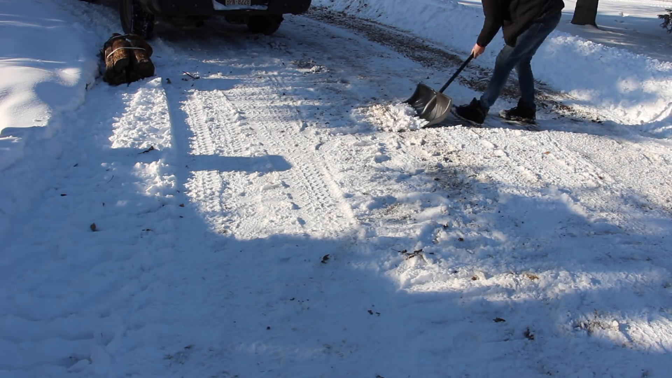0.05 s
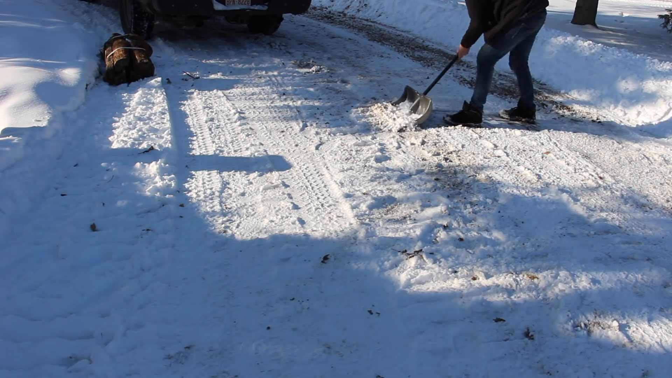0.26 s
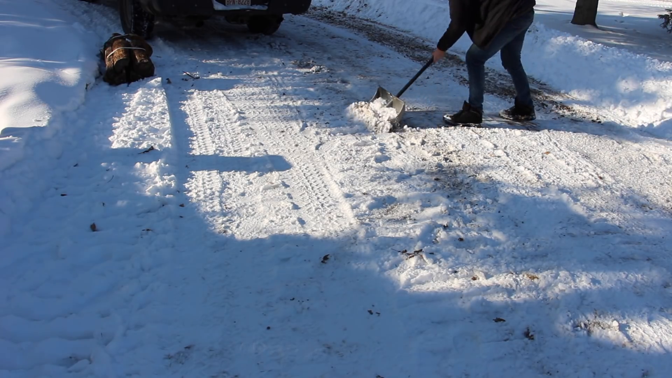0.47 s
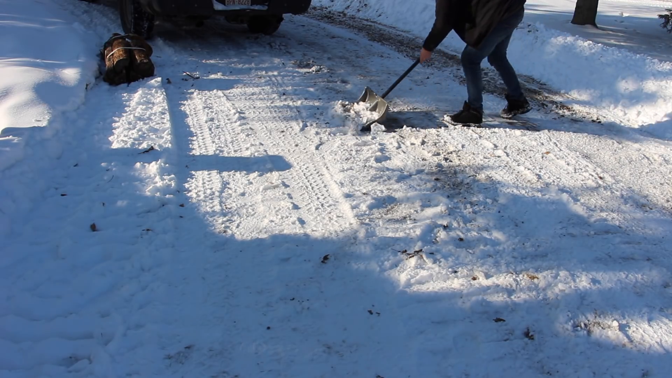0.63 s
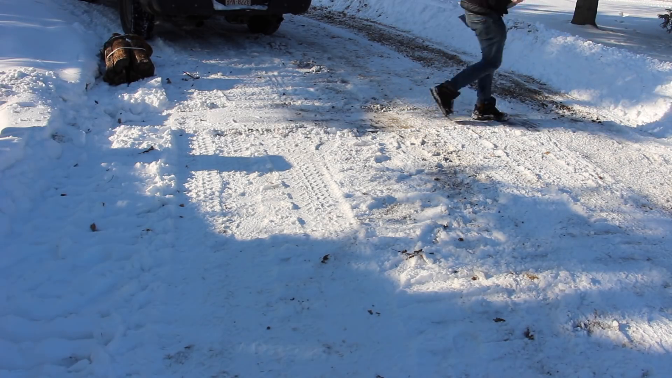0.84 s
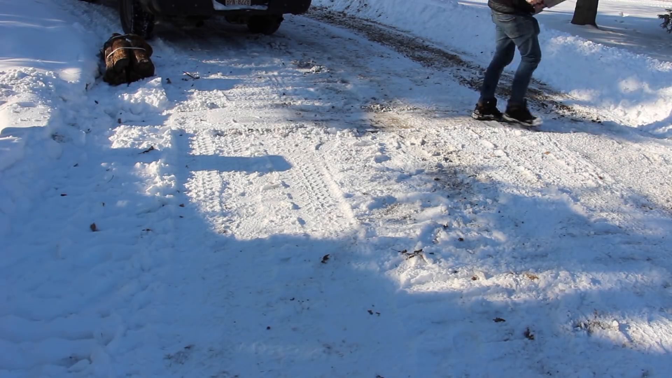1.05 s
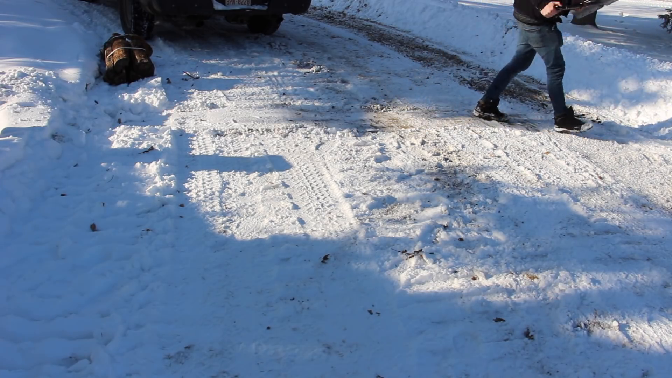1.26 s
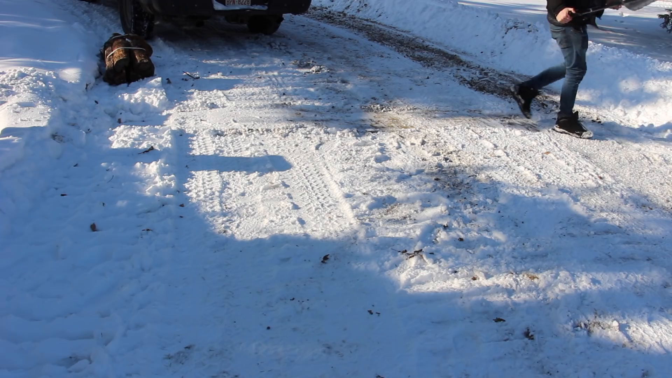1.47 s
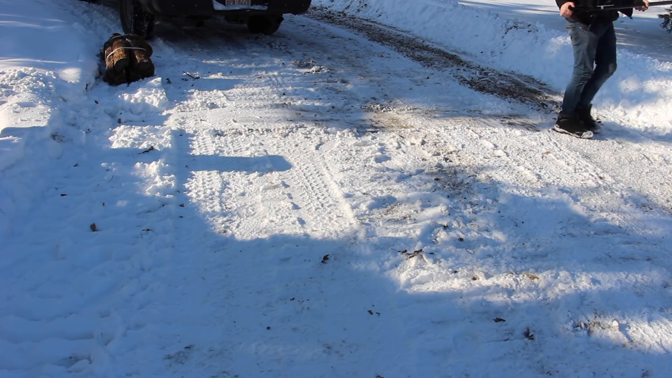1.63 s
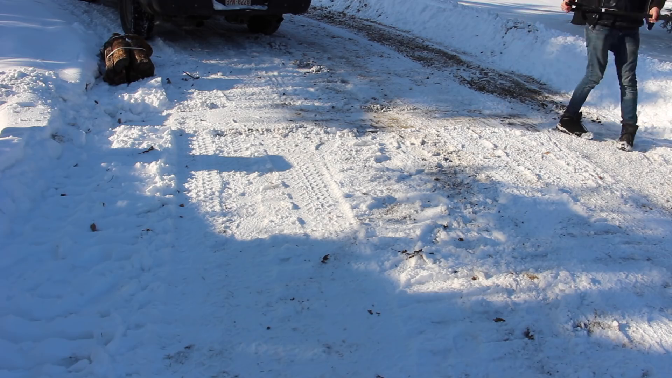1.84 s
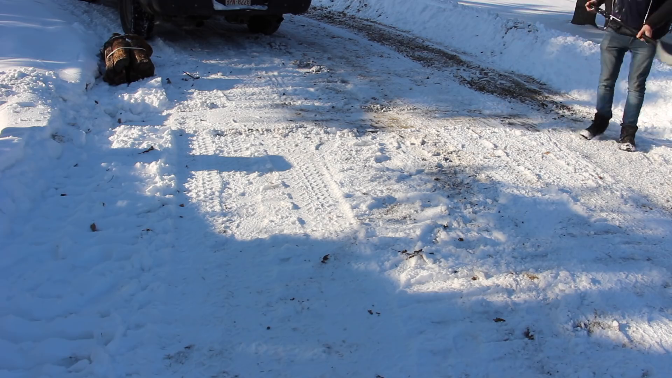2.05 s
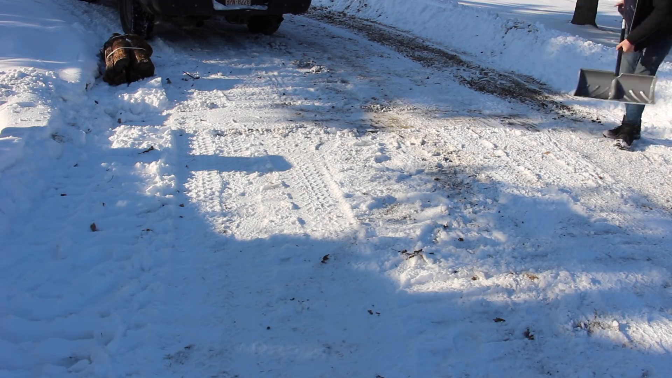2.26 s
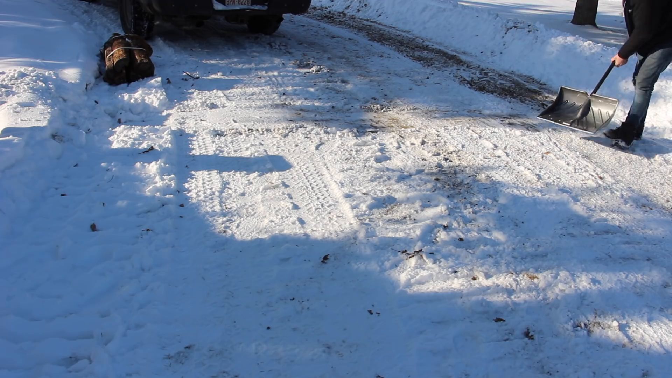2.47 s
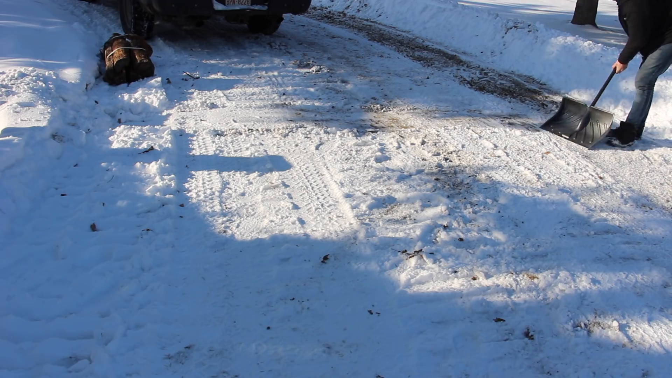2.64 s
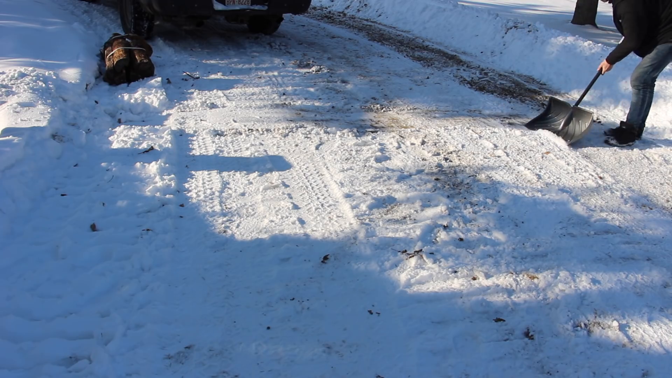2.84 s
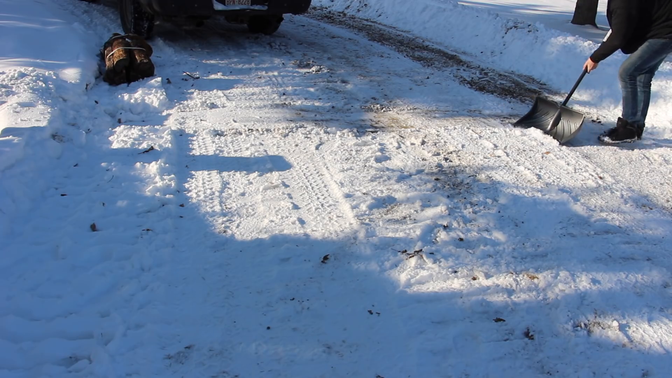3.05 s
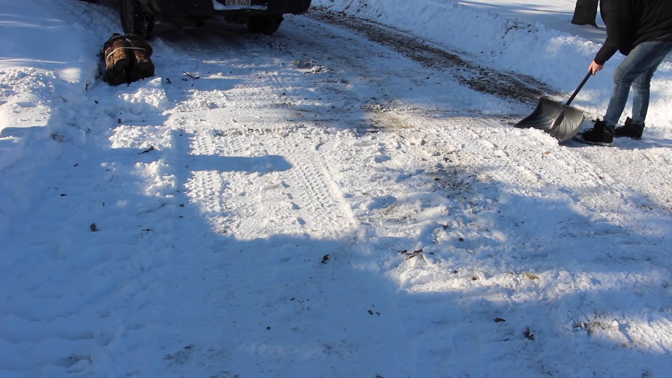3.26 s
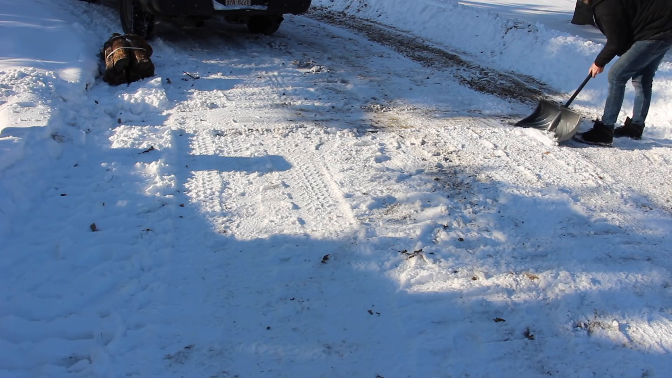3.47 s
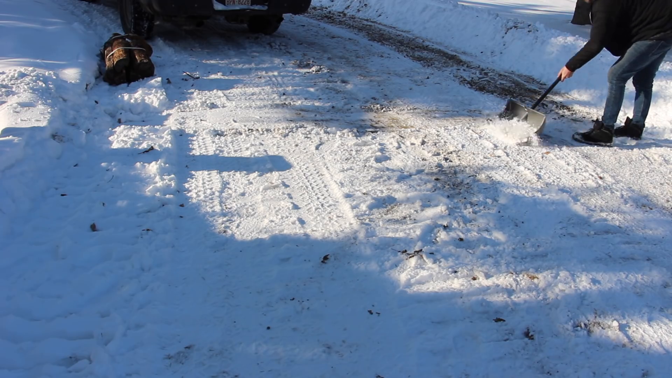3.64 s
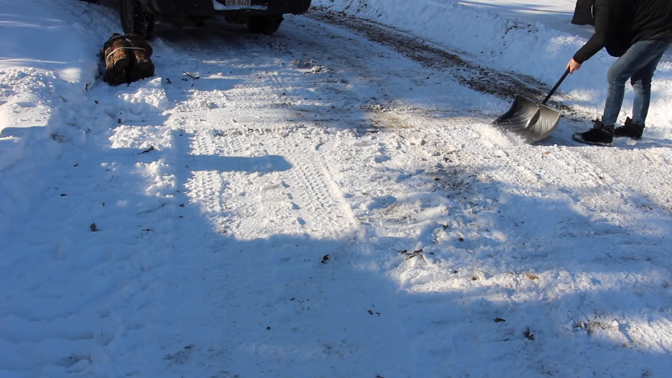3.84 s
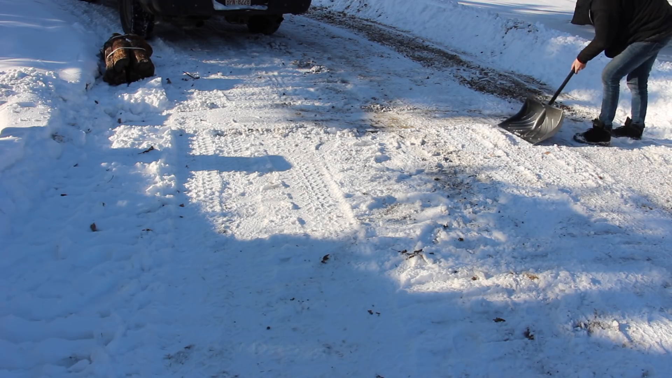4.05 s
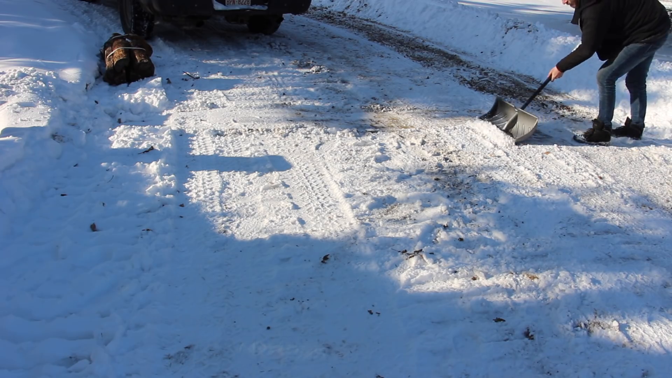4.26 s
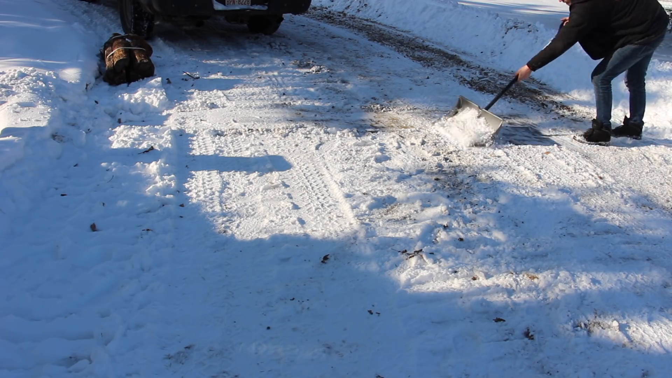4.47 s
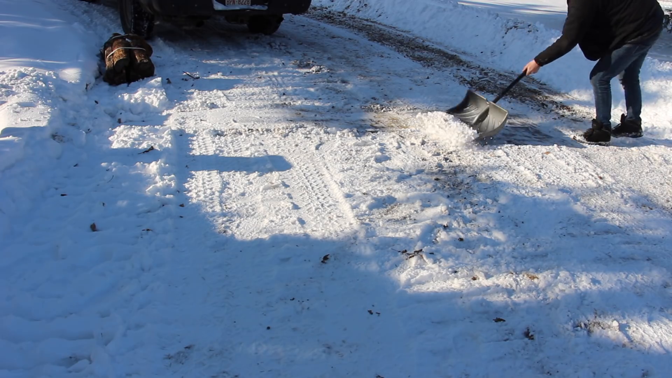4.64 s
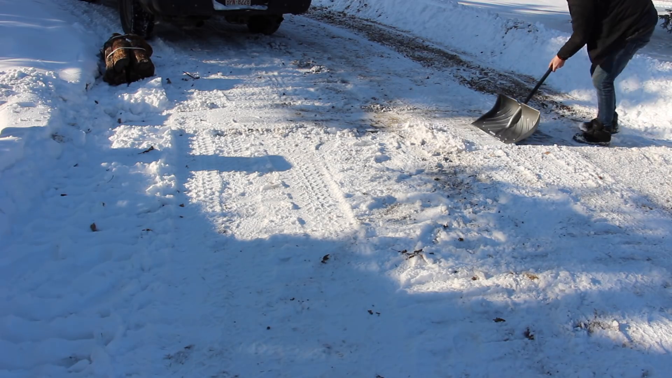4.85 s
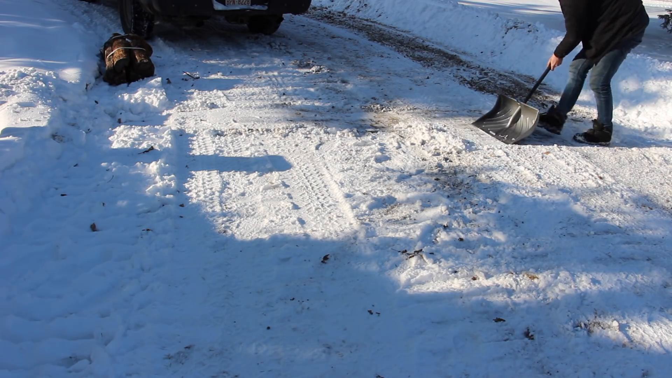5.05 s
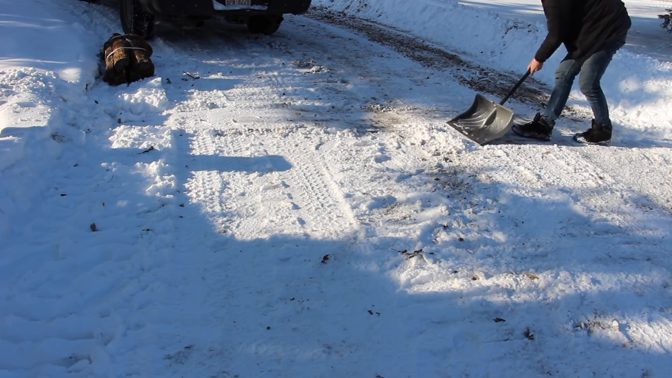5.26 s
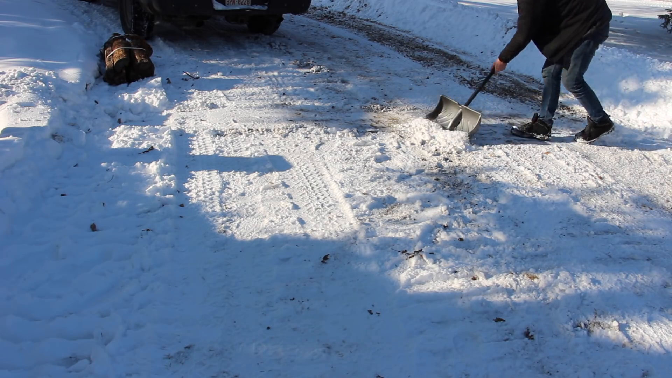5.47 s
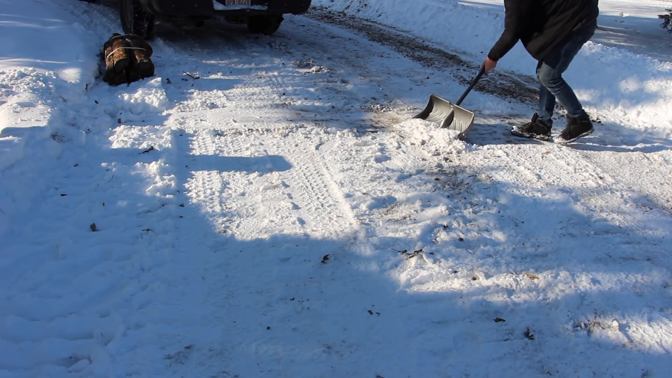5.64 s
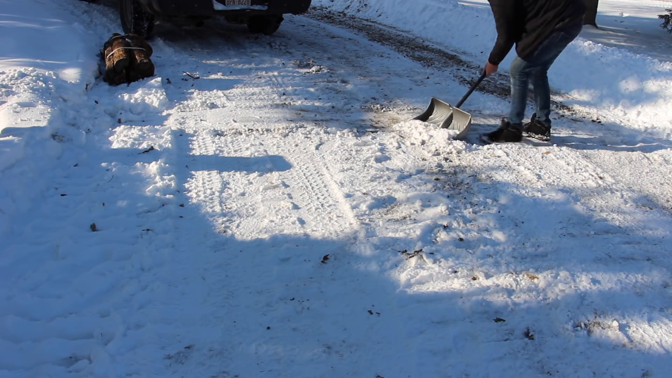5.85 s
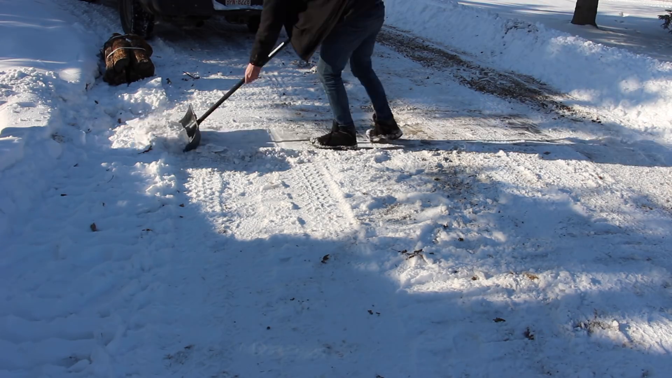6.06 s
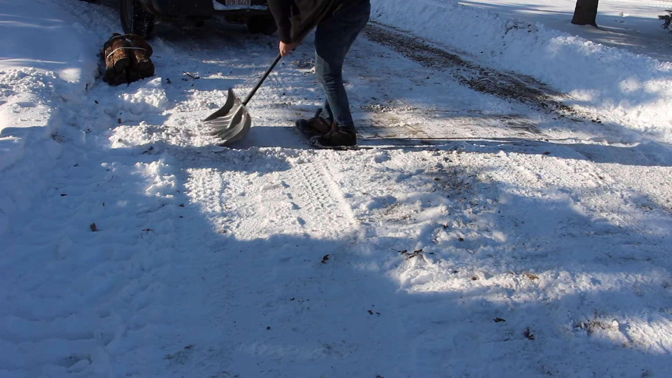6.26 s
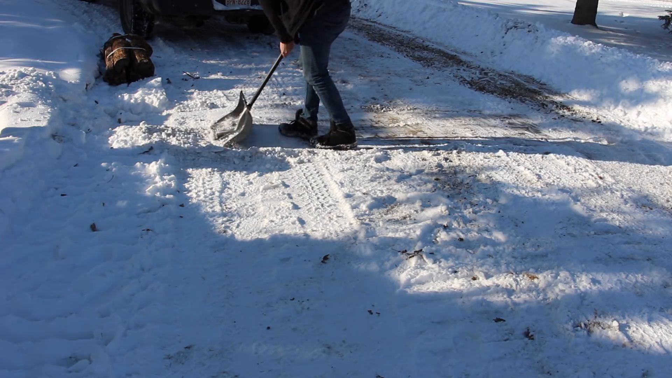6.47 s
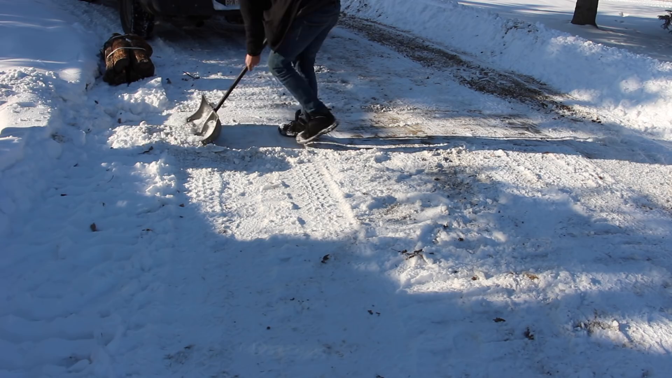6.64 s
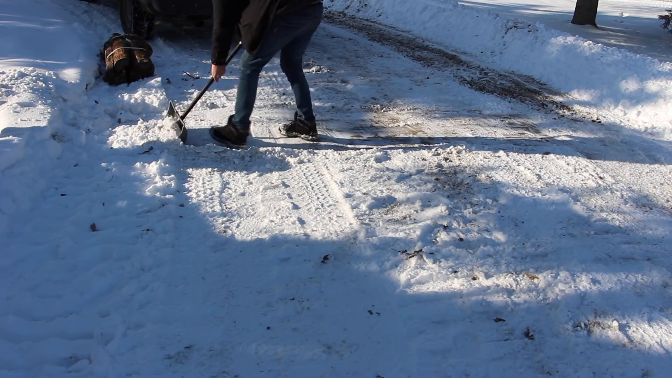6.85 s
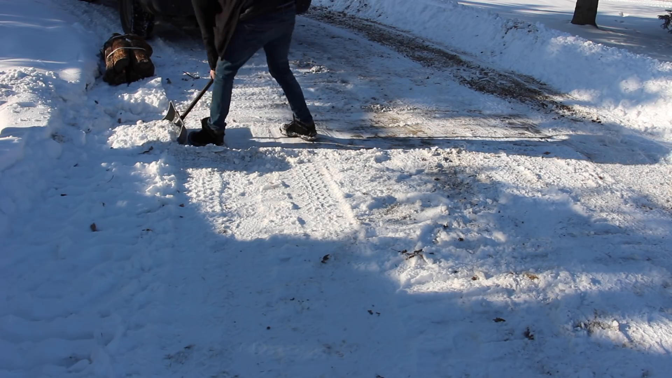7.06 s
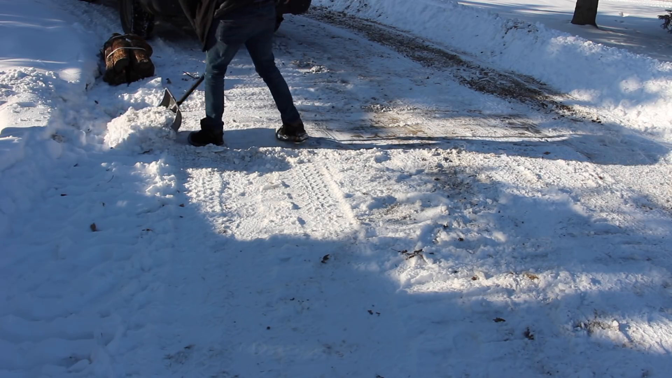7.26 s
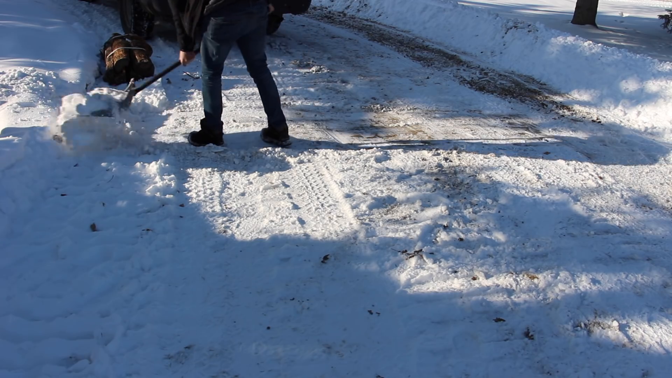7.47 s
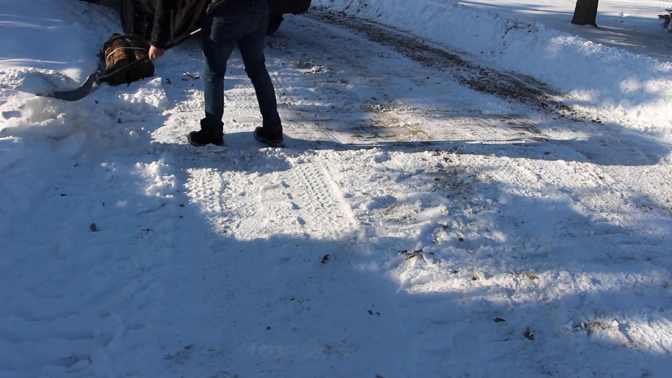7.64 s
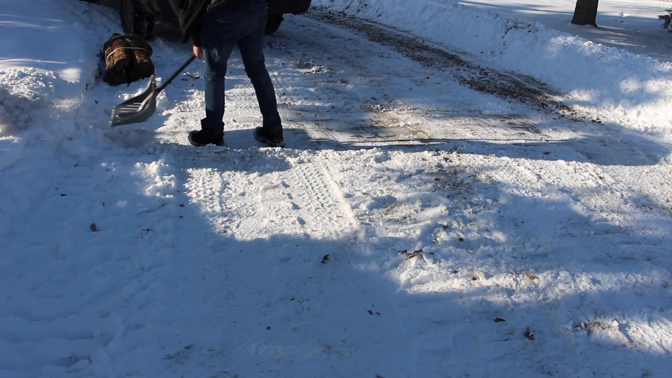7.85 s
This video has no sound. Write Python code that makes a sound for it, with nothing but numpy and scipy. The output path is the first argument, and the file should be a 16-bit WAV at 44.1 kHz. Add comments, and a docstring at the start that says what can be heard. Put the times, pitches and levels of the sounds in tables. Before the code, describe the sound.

A plastic snow shovel scrapes gritty, icy gravel in short hard pushes, stones knocking the blade, with boots crunching in snow between strokes outdoors.

```python
"""A plastic snow shovel is pushed in short strokes over icy gravel: random grit clicks ring the blade's modes.
It works in a yard a few metres from a small housing with two microphone ports. Stones and ice knock the blade,
each a burst of noise through its modes, and the ground thumps in low noise; around and between the strokes
boots crunch and loose snow slides as shaped clicks, and crust snaps with a tick and a dull swing.
Late on, light wind puffs on the ports as low noise, over a quiet bed of air."""
import sys
import numpy as np
from scipy import signal
from scipy.fft import rfft, irfft, next_fast_len
from scipy.io import wavfile
from scipy.ndimage import uniform_filter1d

SR = 44100
rng = np.random.default_rng(int(sys.argv[2]) if len(sys.argv) > 2 else 0)


def dump(signal):
    """Clip the signal to [-1, 1] and save it as 16-bit WAV at the path in sys.argv[1]."""
    limited = np.clip(np.atleast_2d(signal).T, -1, 1)
    pcm = np.round(limited * 32767).astype(np.int16)
    wavfile.write(sys.argv[1], SR, pcm)


N = 348831


def amp(db):
    """Gain of a level in dB."""
    return 10 ** (np.asarray(db) / 20)


def level_db(gain):
    """Level of a gain in dB."""
    return 20 * np.log10(gain + 1e-6)


def evened(x):
    """Scales to rms 1."""
    return x / np.sqrt(np.mean(x ** 2) + 1e-20)


def read(points, hz):
    """Reads a spectrum table on a log frequency axis."""
    f, value = np.transpose(points)
    return np.interp(np.log(hz + 1), np.log(f + 1), value)


def coloured(x, points):
    """Shapes the spectrum by a table, then scales to rms 1."""
    size = next_fast_len(x.shape[-1])
    gain = amp(read(points, np.fft.rfftfreq(size, 1 / SR)))
    return evened(irfft(rfft(x, size) * gain, size)[..., :x.shape[-1]])


def band(x, lo_hz, hi_hz):
    """Band-pass, rms 1."""
    return evened(signal.sosfilt(signal.butter(2, [lo_hz, hi_hz], "bandpass", fs=SR, output="sos"), x))


def controls(tables):
    """Joins tables into curves at sample rate; the first column becomes a gain, zero outside the tables."""
    t, out = np.arange(N) / SR, np.zeros((len(tables[0][0]) - 1, N))
    for rows in tables:
        s, *columns = np.transpose(rows)
        inside = slice(round(s[0] * SR), min(round(s[-1] * SR), N))
        before = out[0, inside].copy()
        out[:, inside] = [np.interp(t[inside], s, c) for c in columns]
        fade = signal.windows.tukey(len(t[inside]), min(1, 0.0042 / (s[-1] - s[0])))
        out[0, inside] = np.maximum(before, amp(out[0, inside]) * fade)
    return out


def grit(per_s, spread_db, clump_db, clump_s):
    """Clicks of random sign and unequal size, stronger in clumps that start fast and die away."""
    sizes = amp(spread_db * np.minimum(rng.exponential(1, N), 4)) * rng.choice([-1., 1.], N)
    fade = np.exp(-1 / (clump_s * SR))
    starts = rng.exponential(1, N) * (rng.random(N) < 1 / (clump_s * SR))
    clumps = signal.lfilter([1], [1, -fade], starts)
    clicks = sizes * (rng.random(N) < per_s / SR)
    return clicks * (clumps + amp(-clump_db))  # a steady share lies under the clumps


def add(mix, s, sound):
    """Mixes a sound in at a time in seconds."""
    part = mix[round(s * SR):][:len(sound)]
    part += sound[:len(part)]


# colour of the quiet yard: (frequency [Hz], relative density [dB per Hz])
AIR_COLOUR = [(15, -37), (25, -0.5), (500, 2), (655, -0.5), (3690, -9), (4450, -12), (6160, -15),
              (6860, -17), (8290, -18), (15800, -23)]


def air():
    """The quiet yard as steady noise, partly alike in both ports."""
    common, left, right = coloured(rng.standard_normal((3, N)), AIR_COLOUR)
    return amp(-58) * np.array([common + 1.6 * left, common + 1.4 * right])  # -58 dB is the common part


# colours of dull tread, crunch and fine fizz: (frequency [Hz], relative density [dB per Hz])
TREAD_COLOUR = [(80, -1), (200, 0.5), (450, 5.5), (900, -1), (2500, -51)]
CRUNCH_COLOUR = [(300, -23), (800, -1), (1500, 3), (2600, -5.5), (6000, -36)]
FIZZ_COLOUR = [(900, -42), (2500, -1), (4000, 0.5), (8500, -9), (12800, -18.5), (15800, -11)]
# single treads and slides of loose snow, levels relative: (start [s], length [s], dull tread [dB],
# crunch [dB], fine fizz [dB], swell from start to end [dB])
TREADS = [(0, 0.082, -47.5, -42.5, -52, -1), (.2, 0.056, -43, -40, -53, 1),
          (0.911, 0.042, -45, -43, -55, -0.5), (.955, 0.02, -49, -28.5, -51, -6.5),
          (0.99, 0.66, -54, -68, -74, -9), (1.552, 0.023, -40, -45.5, -55, 0),
          (1.62, .3, -51, -68, -64, -1), (3.187, 0.058, -38, -39, -49, -6.5),
          (3.266, 0.12, -47.5, -47, -54.5, 7), (3.867, 0.063, -48, -40, -52, -4.5),
          (4.135, 0.062, -36, -34, -56, -1), (4.67, .1, -67, -47, -65, -1.5),
          (4.79, .14, -70, -69, -76, -4), (5.082, .05, -45, -49, -65, -9), (5.137, .06, -52, -51, -59, -9),
          (5.314, 0.067, -40, -39.5, -50, -9), (5.79, 0.062, -44, -45, -66, -4.5),
          (5.864, 0.049, -55, -54, -59, 11), (6.11, 0.065, -51, -49, -55, 0),
          (6.184, 0.086, -53, -51.5, -53, 12), (6.312, 0.16, -46, -40.5, -41, -11)]
# drawn-out steps and shuffles, turning round and tossing the load, levels relative:
# (time [s], dull tread [dB], crunch [dB], fine fizz [dB])
SHUFFLES = [
    [(1.372, -62, -66, -64), (1.386, -41, -37, -48), (1.425, -44, -41, -49), (1.455, -39, -39, -47),
     (1.49, -46, -48, -50), (1.545, -52, -52, -55)],
    [(1.9, -67, -59, -68), (1.914, -44, -46, -50.5), (1.97, -48, -44, -49), (2.06, -41, -41.5, -51),
     (2.146, -47.5, -47, -54), (2.24, -43.5, -49, -48.5), (2.366, -43.5, -42.5, -47.5),
     (2.416, -44, -45, -56), (2.454, -49, -72, -72), (2.56, -42.5, -67, -70), (2.618, -62, -73, -76),
     (2.69, -49, -46, -60), (2.742, -47, -43, -61)],
    [(6.96, -42, -38, -50), (6.985, -58, -44, -63), (7.045, -58, -46, -64), (7.09, -43, -46, -56),
     (7.15, -51, -46, -60), (7.2, -46, -45, -53.5), (7.3, -47, -43.5, -51), (7.4, -50, -43.5, -52),
     (7.48, -46, -40.5, -50), (7.535, -49, -53, -52), (7.62, -48, -50, -49), (7.75, -48.5, -45, -51),
     (7.826, -56, -41.5, -51), (7.84, -58, -68, -52), (7.91, -57, -76, -68)],
]


def crunch():
    """Countless small breaks of snow crystals under boots: a dull tread, a crunch and a fine fizz."""
    rise_s, fall_db_per_s = 0.0083, 498
    clicks = grit(per_s=1600., spread_db=0.5, clump_db=-8.0, clump_s=0.008)
    snow = clicks + amp(-5.0) * np.std(clicks) * rng.standard_normal(N)
    levels, t = np.zeros((N, 3)), np.arange(SR // 2) / SR
    for start, length, *db, swell_db in TREADS:
        swell = swell_db * np.minimum(t / length, 1)
        fall = fall_db_per_s * np.maximum(t - length, 0)
        weight = np.minimum(t / rise_s, 1) * amp(swell - fall)
        add(levels, max(start, 0), weight[:, None] * amp(db))
    for k in range(3):
        levels[:, k] += controls([np.array(rows)[:, [0, k + 1]] for rows in SHUFFLES])[0]
    colours = (TREAD_COLOUR, CRUNCH_COLOUR, FIZZ_COLOUR)
    return amp(-4.0) * sum(level * coloured(snow, colour) for level, colour in zip(levels.T, colours))


# crust snapping under boots, crumbs dropping:
# (time [s], relative level [dB], pitch of the hollow [Hz], relative crack level [dB])
SNAPS = [(0.024, -45, 213, -20), (0.898, -24.5, 721, -29), (0.911, -33, 1090, -20), (0.929, -28, 880, -29),
         (0.963, -21.5, 850, -15.5), (1.053, -38.5, 406, -18), (1.087, -37, 523, -30),
         (1.128, -32.5, 447, -26), (1.228, -38.5, 234, -24), (1.294, -26.5, 330, -13),
         (1.353, -46, 240, -25), (1.365, -38, 853, -19), (1.383, -37, 507, -25), (1.397, -34, 1450, -30),
         (1.409, -30, 762, -24), (1.449, -26, 1090, -13), (1.572, -28.5, 1080, -23), (1.63, -36, 614, -27),
         (1.657, -33, 382, -33), (1.732, -29.5, 392, -28), (1.789, -29.5, 716, -19), (1.831, -32, 415, -23),
         (1.875, -34.5, 503, -25), (1.912, -36, 770, -19), (1.93, -32, 454, -14), (1.994, -35, 633, -2),
         (2.218, -32, 651, -11), (4.759, -51, 1380, 10), (4.904, -36, 832, -16), (5.16, -38, 441, -21),
         (6.157, -34.5, 830, -26), (6.204, -32, 870, -15), (6.403, -35.5, 1360, 4), (7.181, -33, 312, -25),
         (7.217, -31, 507, -26), (7.443, -27.5, 1270, -5), (7.556, -28, 1320, -14), (7.68, -39, 1250, -3),
         (7.824, -46, 245, -21)]


def snaps():
    """A dry tick of breaking crust, then one or two dull swings of the hollow under it."""
    out, t = np.zeros(N), np.arange(700) / SR
    chance = rng.standard_normal((len(SNAPS), 700))
    for (s, db, hz, crack_db), noise in zip(SNAPS, chance):
        burst = (t == 0) + 0.18 * noise * np.exp(-t / 0.0021)  # one clean break, then crumbs
        tick, crack = band(burst, 900, 1600), band(burst, 1800, 7000)
        hollow = np.sin(2 * np.pi * hz * t) * t * hz * np.exp(-t * hz / 0.46)
        snap = amp(-3.0) * tick / abs(tick).max() + hollow / abs(hollow).max()
        snap += amp(crack_db + 6.0) * crack / abs(crack).max()
        add(out, s + 0.000893, amp(db) * snap)
    return out


# modes of the blade, damped by its load: (frequency [Hz], level [dB], nominal 60 dB decay time [s])
BLADE = [(173, -7, 0.042), (290, -1, 0.087), (446, 8, 0.045), (640, 3, 0.071), (850, 4.5, 0.037),
         (1090, 3.5, 0.06), (1454, 5.5, 0.029), (1655, 10, 0.0092), (1921, 7, 0.018), (2377, 6, 0.02),
         (3028, 0.5, 0.023), (4320, 4, 0.0037)]


def ring(weights, damping=1., bend=1.):
    """The blade's modes, each excited by its own weight; flexing and load shift pitch and damping."""
    t = np.arange(2600) / SR
    out = np.zeros(len(t))
    for w, (hz, db, t60) in zip(weights, BLADE):
        out += w * amp(db - 60 * damping * t / t60) * np.sin(2 * np.pi * hz * bend * t)
    return out


# pressure on the blade, one list per push: (time [s], level [dB])
STROKES = [
    [(0.08, -49), (0.094, -28), (0.116, -36), (0.128, -20), (0.156, -20), (0.162, -23), (0.24, -40)],
    [(3.935, -40), (3.945, -18.5), (4.023, -31), (4.031, -20), (4.095, -29.5), (4.115, -29.5), (4.17, -43)],
    [(4.92, -66), (4.936, -19.5), (4.952, -15), (5.006, -38), (5.026, -39), (5.052, -28.5), (5.1, -62)],
    [(5.21, -46), (5.234, -31), (5.25, -30), (5.258, -24.5), (5.28, -16), (5.322, -40), (5.33, -47)],
    [(5.92, -44), (5.962, -17), (5.984, -22), (5.99, -18), (6.06, -20.5), (6.086, -24.5), (6.12, -56)],
    [(6.25, -53), (6.278, -37), (6.282, -26), (6.304, -29.5), (6.312, -40), (6.35, -43)],
    [(0.245, -27), (0.275, -16), (0.453, -21.5), (0.493, -22), (0.689, -19.5), (0.723, -29.5),
     (0.771, -17.5), (0.783, -26.5), (0.851, -22.5), (0.885, -36.5), (0.93, -66)],
    [(2.73, -63), (2.752, -28), (2.838, -23.5), (2.876, -18.5), (2.906, -20), (3.006, -16.5), (3.022, -22),
     (3.044, -23), (3.05, -25.5), (3.13, -19.5), (3.22, -48)],
    [(3.33, -35), (3.364, -19), (3.4, -38), (3.426, -21), (3.46, -27.5), (3.47, -17.5), (3.516, -33),
     (3.542, -14.5), (3.748, -27), (3.78, -18), (3.925, -50.5)],
    [(4.18, -26), (4.192, -13.5), (4.248, -24), (4.264, -15.5), (4.39, -18.5), (4.394, -22.5), (4.44, -17),
     (4.496, -26.5), (4.514, -17), (4.616, -30), (4.7, -59)],
    [(5.392, -35), (5.4, -12), (5.458, -18.5), (5.55, -21.5), (5.558, -14), (5.566, -19.5), (5.64, -17.5),
     (5.646, -22.5), (5.762, -30), (5.79, -44.5), (5.8, -51)],
    [(6.4, -55), (6.474, -23.5), (6.484, -18), (6.518, -34), (6.568, -16), (6.594, -16), (6.61, -18),
     (6.776, -19.5), (6.894, -32), (6.91, -23), (7.0, -48)],
]
# what lies under the edge along the way, relative to pressure:
# (time [s], edge hiss [dB], load boom [dB], icy sheen [dB])
GROUND = [(.15, -14, -8, -22), (.35, -9.5, -5, -22.5), (.75, -14.5, -4.5, -27.5),
          (2.85, -10.5, -2.5, -20.5), (3.1, -11, 0, -31), (3.45, -15.5, -1.5, -25), (3.7, -13.5, -6, -25.5),
          (4.0, -11, -1, -25), (4.2, -15.5, -4.5, -23), (4.45, -10.5, -2, -22), (4.62, -10.5, -0.5, -24),
          (5.0, -20, 1, -23.5), (5.27, -10.5, 0.5, -24), (5.5, -11.5, -5, -19.5), (5.7, -13.5, -1.5, -24.5),
          (5.97, -7.5, -4.5, -23.5), (6.07, -13.5, -7, -22), (6.3, -10.5, -13, -13),
          (6.55, -13.5, -3.5, -13.5), (6.9, -10.5, -7, -19.5)]
# colours of edge hiss and icy sheen: (frequency [Hz], relative density [dB per Hz])
EDGE_COLOUR = [(1000, -40), (2200, -5.5), (3200, -3.5), (4000, -6.5), (6000, -13.5), (8000, -35),
               (14000, -28.5)]
SHEEN_COLOUR = [(4000, -34), (7000, 1), (9800, -3), (12200, -16), (15100, -49), (15800, -52)]


def scrape():
    """Grit hits the edge at one of 24 points by chance, and each point rings another blend of modes."""
    usual_db = -21  # pressure at which the ground table holds
    follow = (1, 0.65, 0.87)  # dB gained by hiss, boom, sheen for each dB of pressure
    points = 24
    pressure = controls(STROKES)[0]
    s, *columns = np.transpose(GROUND)
    excess_db = np.maximum(level_db(pressure) - usual_db, -30)
    t = np.arange(N) / SR
    hiss_db, boom_db, sheen_db = (np.interp(t, s, c) + (f - 1) * excess_db for c, f in zip(columns, follow))
    clicks = grit(per_s=1500., spread_db=2.5, clump_db=-7.5, clump_s=.006)
    point = rng.integers(0, points, N)
    blends = rng.standard_normal((points, len(BLADE)))
    bends = 1 + 0.071 * rng.standard_normal(points)
    body = np.zeros(N)
    for k in range(points):
        body += signal.oaconvolve(clicks * (point == k), ring(blends[k], 0.83, bends[k]))[:N]
    sand = clicks + amp(-7.5) * np.std(clicks) * rng.standard_normal(N)  # finest grains merge into hiss
    hiss = amp(hiss_db - 0.93) * coloured(sand, EDGE_COLOUR)
    sheen = amp(sheen_db - 4.0) * coloured(sand, SHEEN_COLOUR)
    thud = amp(boom_db - 30.0) * band(sand, 31, 115)  # the frozen ground shakes a little
    clatter = amp(-1.0) * band(body, 615, 4000)
    boom = amp(boom_db - 4.0) * band(body, 135, 345)
    return pressure * (thud + clatter + boom + hiss + sheen)


PEBBLES = 200  # chances over the whole scene; those falling between strokes stay silent


def pebbles():
    """Small stones at chance moments and pitches, as loud as the blade is pressed."""
    low_hz, high_hz, crack_db = 281, 1974, -18.5
    when, pitch, size = rng.random((PEBBLES, 3)).T
    pressure = controls(STROKES)[0][(when * N).astype(int)]
    db = level_db(pressure) + 3.5 - 0.5 * (2 * size - 1)
    rows = zip(when * N / SR, db, low_hz * (high_hz / low_hz) ** pitch)
    return [(*row, crack_db) for row, pressed in zip(rows, pressure) if pressed > 0]


# the larger stones and ice lumps that strike the blade:
# (time [s], peak of the ring [dB], pitch [Hz], crack peak relative to the ring [dB])
KNOCKS = [(0.0934, -29, 635, -23), (.129, -6.5, 640, -27), (0.149, -2, 2440, -17), (0.25, -19, 1120, -10),
          (.2614, -8, 2300, -17), (.276, -7.5, 314, -17), (0.2885, -2, 1090, -23), (.2951, -9, 650, -25),
          (.3496, -17, 1890, -16), (0.385, -9, 2379, -22), (.4354, -7.5, 1250, -20),
          (.444, -6.5, 1960, -19), (0.476, -22, 1550, -11), (.523, -12.5, 480, -22),
          (0.5518, -10, 1100, -19), (0.567, -12, 564, -19), (0.586, -15, 310, -13), (0.6041, -10, 486, -25),
          (0.6148, -11, 473, -24), (.626, -20, 706, -7), (0.645, -10.5, 1510, -29),
          (0.6832, -6.5, 1110, -22), (.6988, -17.5, 504, -10), (0.7343, -26, 2150, -19),
          (.761, -10.5, 790, -18), (0.8315, -12, 1630, -19), (0.8474, -9, 2000, -14.5),
          (2.7472, -18.5, 241, -5), (2.8655, -10, 266, -17), (2.8772, -15, 820, -24),
          (2.9443, -13, 440, -20), (2.9637, -8, 655, -15), (2.9775, -7.5, 724, -11), (2.9989, -3, 670, -23),
          (3.0105, -8, 1110, -30), (3.04, -4, 694, -32), (3.0614, -13, 272, -19), (3.1038, -8, 490, -12),
          (3.1334, -2.5, 453, -20), (3.1625, -16.5, 535, -15), (3.2274, -24.5, 570, -23),
          (3.346, -22, 1490, -15), (3.361, -9, 810, -31), (3.4244, -11.5, 675, -23), (3.47, -5, 2520, -18),
          (3.4972, -16, 930, -18), (3.5339, -14, 850, -15), (3.5432, -5, 930, -25), (3.5549, -3, 1080, -31),
          (3.6016, -2.5, 1510, -16.5), (3.6403, -2, 690, -22), (3.6703, -16, 685, -18),
          (3.704, -14, 2410, -18), (3.714, -9.5, 1060, -18), (3.7607, -11, 656, -16),
          (3.7834, -11, 714, -22), (3.9455, -6, 840, -19), (3.961, -8.5, 380, -14),
          (4.01, -12.5, 1370, -12), (4.0357, -10, 1126, -20), (4.0847, -8, 1530, -28),
          (4.1893, -4.5, 1200, -20), (4.1956, -9, 450, -27), (4.2204, -7, 766, -22), (4.259, -18, 940, -13),
          (4.277, -8.5, 367, -12), (4.3125, -7, 724, -6), (4.3845, -17, 1170, -22), (4.4146, -11, 650, -21),
          (4.442, -6.5, 1030, -29), (4.515, -11.5, 355, -20), (4.5584, -12, 885, -27),
          (4.594, -6, 291, -22), (4.6306, -20, 426, -15), (4.938, -5, 1970, -28), (4.9482, -9.5, 830, -10),
          (5.0467, -29, 254, -23), (5.2367, -9, 1500, -21), (5.2475, -5.5, 663, -27),
          (5.2773, -13.5, 870, -7), (5.3991, -1, 1100, -11.5), (5.409, -6, 1090, -13),
          (5.4278, -17, 900, -6), (5.482, -8, 1710, -17), (5.5204, -11.5, 570, -19), (5.554, -13, 290, -25),
          (5.6031, -8.5, 980, -18), (5.633, -13, 890, -12), (5.6711, -11.5, 880, -19),
          (5.7226, -19, 460, -23), (5.7537, -19, 1090, -22), (5.9584, -7, 1530, -11),
          (5.9668, -12, 1991, -8), (5.994, -7.5, 1120, -22), (6.0047, -10, 890, -21), (6.04, -6, 860, -27),
          (6.0587, -11.5, 595, -21), (6.2838, -13, 1170, -24), (6.3009, -13.5, 2010, -25),
          (6.4298, -24.5, 1000, -1), (6.485, -10.5, 882, -17), (6.5713, -9, 1800, -10),
          (6.59, -9, 1940, -15), (6.6516, -16.5, 684, -4), (6.7026, -14, 1430, -19), (6.767, -9, 1020, -24),
          (6.7801, -9, 1210, -20), (6.8031, -11, 555, -13), (6.9099, -15, 1800, -19),
          (7.104, -18, 1170, -25)]


def knocks():
    """Each stone crumbles for a few ms and rings the modes near its pitch, with a crack on top."""
    crumble_ms = 2.16  # time to fall to 1/e
    out, hz_modes, stones = np.zeros(N), np.array(BLADE)[:, 0], KNOCKS + pebbles()
    chance = rng.standard_normal((len(KNOCKS) + PEBBLES, 600))
    for (s, db, hz, crack_db), noise in zip(stones, chance):
        crumble = noise * np.exp(-np.arange(600) / (crumble_ms * SR / 1000))
        # all modes shift together until the nearest one meets the pitch
        bend = hz / hz_modes[np.argmin(abs(np.log(hz_modes / hz)))]
        near = amp(-11. * abs(np.log2(bend * hz_modes / hz)))  # 11 dB weaker per octave away
        tone = band(np.convolve(crumble, ring(near, 2.35, bend)), 337, 6700)
        crack = band(np.pad(crumble, (0, len(tone) - 600)), 3000, 11000)
        knock = tone / abs(tone).max() + amp(crack_db) * crack / abs(crack).max()
        add(out, s, amp(db) * knock)
    return out


# dull thumps of boot and blade on the frozen ground: (time [s], level [dB], length [s], pitch [Hz])
THUMPS = [(0.275, -36.5, .04, 80), (.86, -42, .03, 55), (2.21, -46, 0.12, 153), (2.745, -36.5, .03, 80),
          (2.987, -31, .03, 55), (3.13, -39, 0.021, 80), (3.945, -29, .03, 90), (4.595, -33, .02, 80),
          (4.93, -32, 0.034, 90), (5.25, -27, .03, 70), (6.47, -34.5, 0.066, 140)]


def thumps():
    """Short low pushes of the ground without a ring: narrow noise under a smooth hump."""
    span = 1.37  # the band reaches this factor above and below the pitch
    out, chance = np.zeros(N), rng.standard_normal((len(THUMPS), SR // 4))
    for (s, db, length, hz), noise in zip(THUMPS, chance):
        push = np.hanning(round(length * SR))
        add(out, s, amp(db) * push * band(noise, hz / span, hz * span)[-len(push):])
    return out


# colour of a puff: (frequency [Hz], relative density [dB per Hz])
PUFF_COLOUR = [(15, -26), (40, -3.5), (80, -6), (140, -12.5), (250, -45), (500, -59)]
# puffs of wind: (peak time [s], relative level [dB], swell [s], dying [s])
GUSTS = [(6.235, -53, .05, .04), (6.34, -34, .05, 0.032), (6.435, -43, 0.036, 0.078),
         (6.61, -45, .08, 0.036), (6.87, -47, 0.061, 0.42), (7.07, -40.5, 0.23, 0.08),
         (7.16, -38.5, 0.057, 0.057), (7.26, -44, .03, .04), (7.32, -45, .04, .04)]


def wind():
    """Low lumpy puffs that push the two ports in opposite directions."""
    edge_db = -22.5  # level at the ends of swell and dying, relative to the peak
    t = np.arange(N) / SR
    level = np.zeros(N)
    for s, db, swell, dying in GUSTS:
        level += amp(db + edge_db * np.maximum((s - t) / swell, (t - s) / dying))
    push, own = coloured(rng.standard_normal((2, N)), PUFF_COLOUR)
    lumps = amp(2.9 * evened(uniform_filter1d(rng.standard_normal(N), 1500)))
    return amp(5.0) * level * lumps * np.array([0.8 * push + 0.39 * own, -1.1 * push + 0.34 * own])


def yard(x):
    """Sparse echoes off ground, car and banks, at chance times and different for each port."""
    t, t60 = np.arange(4000) / SR, .06
    hits = rng.choice([-1., 1.], (2, 4000)) * (rng.random((2, 4000)) < 5000 / SR)
    taps = hits * amp(-60 * t / t60)
    return signal.oaconvolve(x[None], taps / np.linalg.norm(taps, axis=1)[:, None], axes=1)[:, :N]


# where the digger stands: (time [s], bearing [right = 1], shading of the right port [0-1])
BEARING = [(0, -0.16, 0.23), (.9, 2.05, 0.23), (1.6, 1.46, 0), (2.9, 0.91, 0.03), (3.7, 0.93, 0.13),
           (4.4, 0.37, 0.12), (5.5, 0.45, 0.16), (6.0, 0.19, 0.32), (6.5, 0.32, 0.8), (6.9, -0.59, 0.8),
           (7.3, -1.1, 0.85), (7.91, -1.8, 1)]
# lead of the near port at bearing 1: (frequency [Hz], phase [rad])
PORT_LEAD = [(100, -0.44), (700, 0.25), (3500, 0.37), (6200, 0.3), (7600, 0.25), (10300, 1.6), (15000, 1.6)]
# body shading at its fullest: (frequency [Hz], left minus right [dB])
SHADE_DB = [(200, 0), (1400, 2.5), (3500, 10.5), (4800, 10), (7600, 0), (10300, 5), (15000, 4)]
# weight of the echoes off the axis: (frequency [Hz], relative level [dB])
ECHO_DB = [(100, -18.5), (1000, -12.5), (5000, -14.5), (8000, 1), (15000, -8)]
# standing difference of the ports: (frequency [Hz], left minus right [dB])
PORT_DB = [(60, 5.5), (150, 1), (300, 2.5), (700, 1.4), (1400, -1.5), (3000, -3), (6000, -0.5), (8000, 1.2),
           (14000, -1)]


def ports(x):
    """Off the axis, one port hears the sound earlier, the body shades the other and echoes weigh more."""
    size = next_fast_len(N)
    hz, z = np.fft.rfftfreq(size, 1 / SR), rfft(x, size)
    s, *columns = np.transpose(BEARING)
    bearing, shading = (np.interp(np.arange(N) / SR, s, c) for c in columns)
    # half the difference between the ports, in phase and in level
    lead = irfft(-1j * z * np.tan(np.clip(read(PORT_LEAD, hz) / 2, 0, 1.2)), size)[:N]
    shade = irfft(z * np.tanh(np.log(amp(read(SHADE_DB, hz))) / 2), size)[:N]
    side = bearing * lead + shading * shade
    echoes = irfft(rfft(yard(x), size) * amp(read(ECHO_DB, hz)), size)[:, :N]
    echoes = echoes * (0.18 + 0.83 * abs(bearing))
    half = amp(read(PORT_DB, hz) / 2)
    pair = np.array([x + side, x - side]) + echoes
    return irfft(rfft(pair, size) * np.array([half, 1 / half]), size)[:, :N]


def scene():
    """All sources at the two ports; the housing thins the bass of sound from the digger."""
    near = ports(scrape() + knocks() + snaps() + crunch() + thumps())
    airborne = signal.sosfilt(signal.butter(2, 100, "highpass", fs=SR, output="sos"), near)
    return airborne + wind() + air()


def record(dry):
    """The microphone capsule fades in the top octave; a hard knee just under full scale, then a band limit."""
    dull = signal.sosfilt(signal.butter(3, 12500, fs=SR, output="sos"), dry)
    held = np.clip(dull, -.93, .93)
    limit = signal.firwin(1023, 15960, window=("kaiser", 9), fs=SR)  # cutoff in Hz
    return signal.oaconvolve(held, limit[None], "same")


dry = scene()
out = record(dry)
dump(out)
```